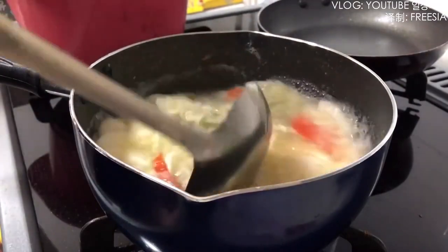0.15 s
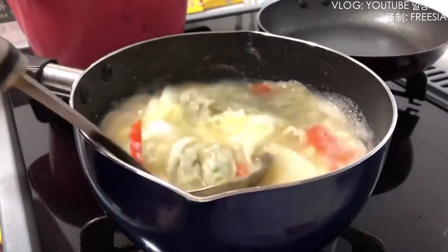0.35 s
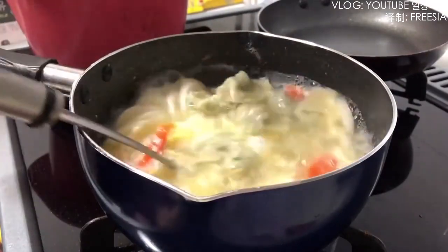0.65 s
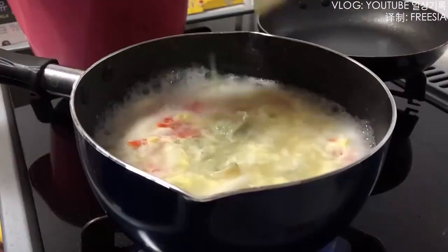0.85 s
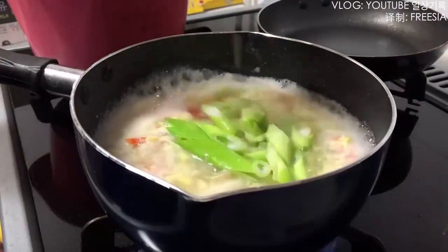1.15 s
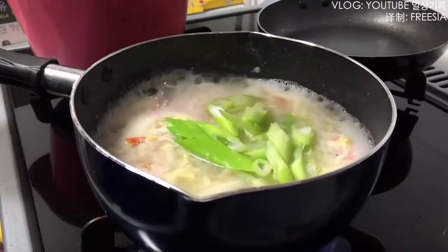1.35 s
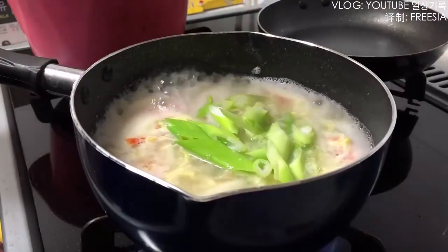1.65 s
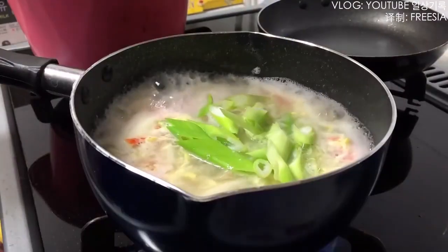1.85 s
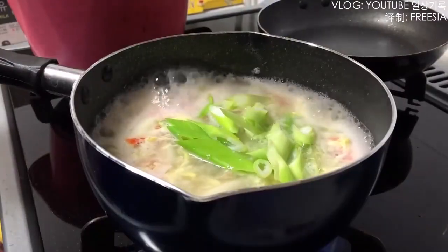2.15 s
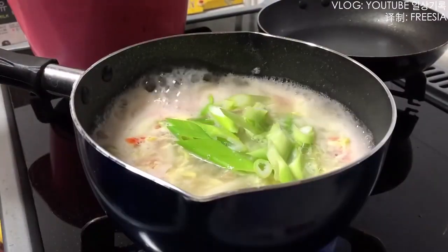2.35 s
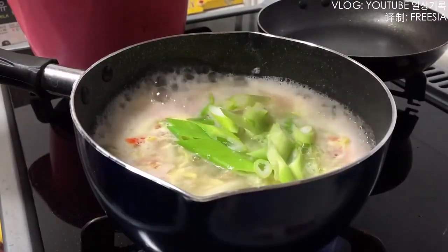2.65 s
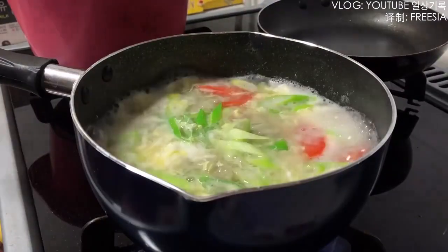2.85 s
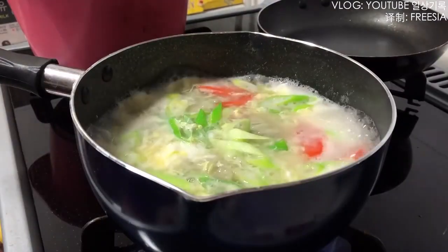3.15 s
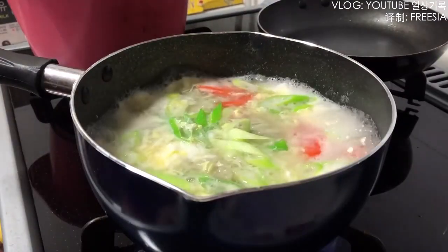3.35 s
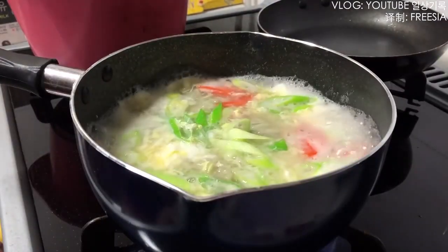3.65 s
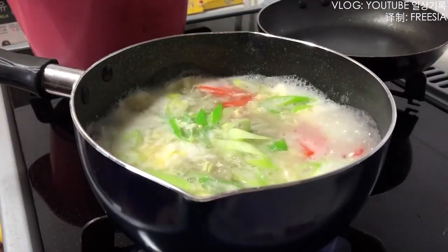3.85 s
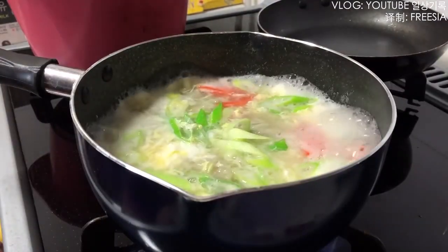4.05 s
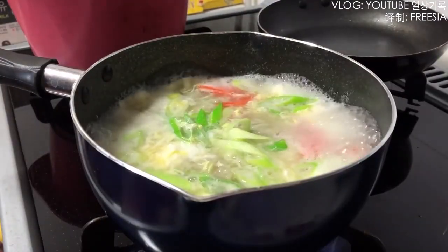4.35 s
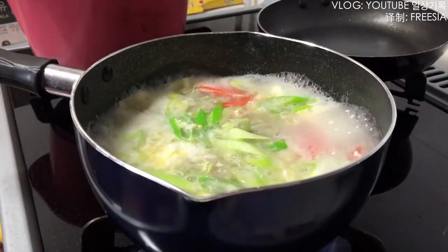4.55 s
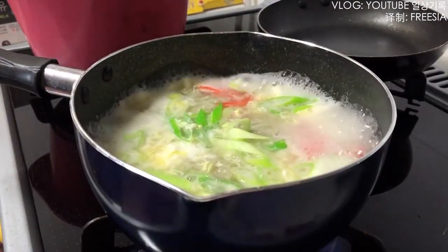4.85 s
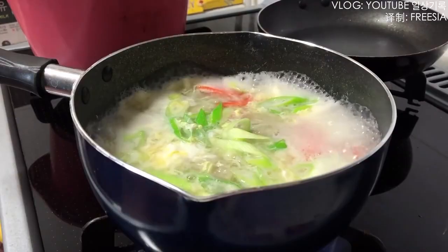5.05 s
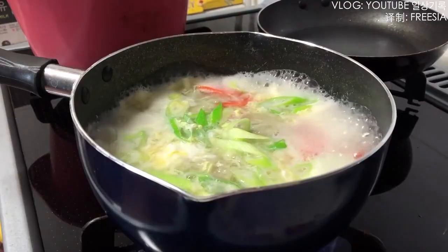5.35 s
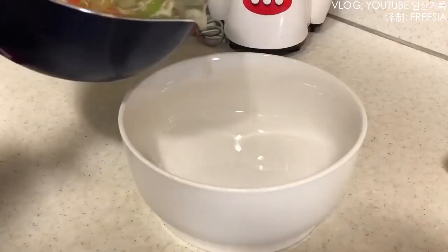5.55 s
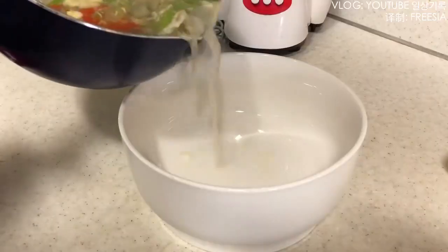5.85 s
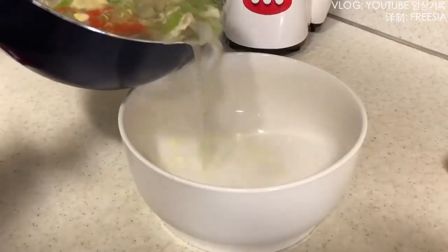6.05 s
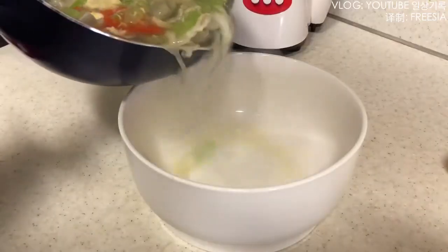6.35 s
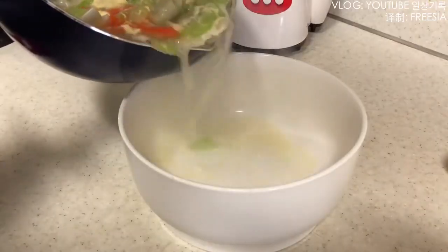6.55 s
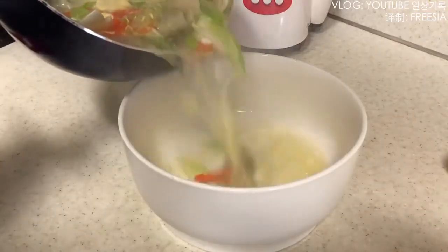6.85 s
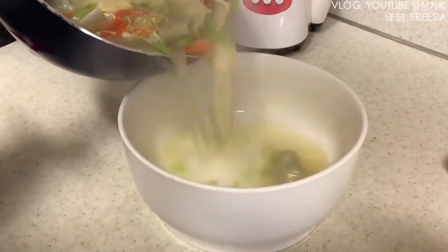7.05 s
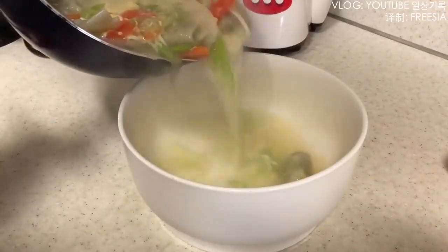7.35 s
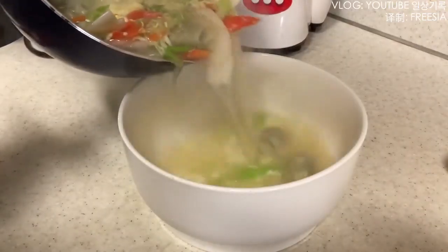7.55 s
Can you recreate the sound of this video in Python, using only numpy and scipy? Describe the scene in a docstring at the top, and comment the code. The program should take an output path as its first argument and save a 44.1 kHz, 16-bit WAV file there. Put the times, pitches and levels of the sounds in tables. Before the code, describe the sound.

Four close-miked kitchen moments joined by abrupt cuts, with only a short dull room reverberation. First a low flame, bubbling and ladle knocks; then a stronger flame hiss with wet leek ticks, a rubbing swish and a clunk, and a long simmer. Next comes loud crackling sizzle with low scraping of the pot. Finally the background nearly vanishes and soup pours unevenly, spattering, gurgling and faintly ringing the bowl.

```python
"""A small kitchen, one close microphone, four moments joined by hard cuts: low flame, high flame, sizzle, counter.
Soup simmers (gliding sine bubbles) over a hissing gas flame (shaped noise) while ladle and pot knock on the hob
(struck modes and short noise) and sliced leek drops in (short noise bursts). The tilted pot sizzles on its hot
wall (surging hiss and crackle); then, at a quiet counter, soup splashes (ticks, low plops, spatter, spray,
gurgling bubbles) into a china bowl that rings (decaying modes)."""
import sys
import numpy as np
from scipy import signal
from scipy.fft import rfft, irfft
from scipy.io import wavfile
from scipy.ndimage import uniform_filter1d

SR = 44100
rng = np.random.default_rng(int(sys.argv[2]) if len(sys.argv) > 2 else 0)


def amplitude_ratio(level_db):
    """Convert a level in decibels to the matching linear amplitude (field) ratio."""
    exponent = np.asarray(level_db, float) / 20
    return 10 ** exponent


def wav_record(signal):
    """Record a signal, one row per channel, as 16-bit PCM in the file named by sys.argv[1]."""
    frames = np.transpose(np.atleast_2d(signal))
    bounded = np.clip(frames, -1, 1)
    # unit amplitude maps onto the largest positive 16-bit level
    quanta = np.round(bounded * 32767).astype(np.int16)
    wavfile.write(sys.argv[1], SR, quanta)


N = 340011
T = np.arange(N) / SR
HZ = np.maximum(np.fft.rfftfreq(N, 1 / SR), 1)

# borders of the four moments: (time [s])
CUTS = [0, .862, 4.582, 5.51, 7.72]

# soup slapping into the bowl: (time [s], tick peak [dB], colour [Hz], spatter against the tick [dB])
SLAPS = [(6.0044, -46, 7000, -11), (6.015, -49, 8000, -10), (6.0553, -29.5, 6400, -9),
         (6.072, -25, 4830, -8.5), (6.134, -40, 5300, -6), (6.1619, -50, 10000, -9),
         (6.255, -37, 4200, -14), (6.2619, -31, 3600, -11), (6.2942, -37, 5100, -5),
         (6.3365, -50, 8600, -16), (6.373, -44, 7000, -10), (6.3897, -33.5, 5900, -17),
         (6.398, -48, 11000, -16), (6.413, -43, 7000, -12), (6.424, -41, 7100, -10),
         (6.4356, -36, 7160, -11), (6.446, -41, 4000, -4), (6.484, -38.5, 3650, -3),
         (6.5158, -35.5, 9500, -14), (6.534, -52, 10000, -16), (6.542, -29, 4980, -26),
         (6.569, -40, 4500, -4), (6.5857, -23, 6550, -15), (6.623, -42, 9000, -12),
         (6.627, -34.5, 7550, -7.5), (6.664, -36.5, 3600, -12), (6.672, -36, 5900, -14),
         (6.6797, -37, 7300, -5), (6.734, -43.5, 7510, -11), (6.75, -40, 4060, -4),
         (6.785, -33.5, 7210, -7.5), (6.806, -40, 4480, -4), (6.8132, -35.5, 5030, -4),
         (6.8362, -36, 6830, -2), (6.8569, -18.5, 8300, -5.5), (6.8774, -17.5, 8000, 0),
         (6.953, -35, 9500, -7), (6.9625, -26, 8540, -10), (6.999, -31, 5340, -8), (7.009, -32, 3530, -4),
         (7.0606, -34, 3550, -9), (7.089, -36, 8300, -4), (7.13, -43, 5300, 1), (7.1744, -39, 3760, -6),
         (7.1827, -40, 8000, -6), (7.192, -34.5, 3100, -7.5), (7.2193, -34, 5500, -13),
         (7.2455, -40, 6800, -5), (7.2648, -34, 7820, -9), (7.2874, -27.5, 4930, -6.5),
         (7.298, -41, 5020, -19), (7.3386, -30, 4900, -7.5), (7.3614, -33, 5750, -10),
         (7.376, -34, 8000, -12), (7.385, -31.5, 7200, -7), (7.4226, -41, 5520, -6),
         (7.4415, -36.5, 3330, -7.5), (7.4856, -44, 3780, -8), (7.5114, -39, 8470, -9),
         (7.519, -35, 8000, -13), (7.5246, -31.5, 5500, -7.5), (7.572, -42, 3020, -1),
         (7.6403, -54, 3280, -9), (7.679, -40, 4170, -20)]
# spray of the stream, a reference its layers are trimmed from: (time [s], level [dB])
SPRAY = [(6.03, -81), (6.12, -59.5), (6.2, -73), (6.35, -68), (6.46, -57.5), (6.66, -58.5), (6.73, -73),
         (6.84, -56), (6.9, -56), (7.03, -53), (7.14, -56), (7.16, -57), (7.29, -54.5), (7.42, -55.5),
         (7.5, -65), (7.545, -49.5), (7.71, -57)]
# clear bubbles caught under the stream: (time [s], bubble peak [dB], pitch [Hz], decay [cycles])
PLINKS = [(6.279, -51, 1650, 13), (6.462, -39.5, 2600, 11), (6.513, -40, 2450, 6.4),
          (6.525, -56, 2400, 5.8), (6.568, -44.5, 2540, 14), (6.679, -52, 2500, 11), (6.5, -43, 3500, 9),
          (6.582, -48, 2900, 6), (7.535, -49, 1500, 43), (6.849, -44, 3200, 5.9), (7.64, -55, 3900, 25),
          (7.567, -51, 1800, 6.9)]
# lumps of soup plunging in, a reference for gurgle and tremble: (time [s], hold [s], level [dB])
GLUGS = [(6.02, 0.085, -57), (6.253, 0.02, -49.5), (6.373, 0.0062, -45.5), (6.46, 0.041, -49),
         (6.61, 0.022, -46.5), (6.655, 0.033, -44.5), (6.747, 0.018, -42), (6.83, 0.058, -49.5),
         (6.93, 0.017, -47.5), (7.075, 0.0091, -42.5), (7.18, 0.018, -60), (7.286, 0.033, -62),
         (7.535, 0.03, -61)]
# resonances of bowl and pooled soup: (frequency [Hz], width [Hz], strength [dB])
POOL = [(109, 39, -2), (201, 82, 0), (288, 47, -4.5), (605, 89, -8)]
# blows and heavy splashes that ring the bowl: (time [s], peak [dB], colour [Hz])
BOWL_RINGS = [(5.958, -37, 2350), (5.956, -48, 6300), (6.055, -47, 4220), (6.07, -34.5, 4240),
              (6.136, -64, 3500), (6.216, -46.5, 4200), (6.261, -53, 3300), (6.855, -46, 1620),
              (6.88, -39.5, 1620)]
# modes of the china bowl: (frequency [Hz], strength [dB], t60 [s])
BOWL_MODES = [(1620, -6, .09), (2433, -4, .1), (2470, -19, .06), (2920, -18, .07), (3892, -8, .12),
              (4185, -10, .12), (4230, -2, .13), (5787, -3, .11), (7000, -7, .12), (8005, -8, .12),
              (9995, -5, .1)]
# light ticks on thin metal before the pour: (time [s], level ahead of the ring/noise mix [dB], colour [Hz])
METAL_TICKS = [(5.713, -36.5, 6760), (5.862, -34.5, 6200)]
# modes of the thin metal: (frequency [Hz], strength [dB], t60 [s])
METAL_MODES = [(2410, -4, 0.13), (2850, -6, 0.13), (3900, -4.5, 0.25), (4400, -10, 0.19),
               (4700, -20, 0.093), (4980, 1, 0.11), (5500, -6, 0.12), (5900, -21, .09), (6430, -24, .09),
               (6900, 6, 0.057), (6980, 8, 0.076), (7110, -17, .09), (7795, -19, .06), (8200, -19, 0.084),
               (9500, -15, .06), (10600, 1, 0.064), (11100, -4, 0.088), (11500, -12, .08), (12440, -8, .06)]

# dull knocks, and from 6.75 s the low plops of heavy soup slaps:
# (time [s], peak [dB], colour [Hz], length of the noise [s], crack in the blend [dB])
KNOCKS_AND_PLOPS = [(.337, -28, 2030, 0.005, 0), (0.409, -33.5, 1000, 0.0059, -6),
                    (0.821, -26.5, 590, 0.012, 0.5), (0.846, -35, 607, 0.014, -5),
                    (2.843, -32.5, 690, 0.0084, -2), (3.096, -26.5, 900, 0.016, -2),
                    (3.099, -29, 560, 0.015, -25), (3.111, -31.5, 1900, 0.022, -20),
                    (3.105, -28.5, 1490, 0.011, -20), (3.127, -30, 1770, .006, -25),
                    (3.142, -36.5, 1380, 0.045, -25), (4.647, -27.5, 665, 0.047, -25),
                    (5.302, -27, 258, 0.016, -30), (5.326, -24.5, 331, 0.03, -30),
                    (5.74, -54.5, 700, .008, -15), (5.761, -55, 600, .008, -13),
                    (5.956, -18, 583, 0.0078, -36), (6.754, -47, 536, 0.0059, -15),
                    (6.859, -27.5, 1000, 0.0068, 0), (6.874, -26.5, 754, 0.022, 17),
                    (6.947, -39, 566, 0.01, -15), (7.061, -31.5, 1150, 0.0087, 3),
                    (7.087, -31.5, 600, 0.006, -24), (7.186, -45, 650, 0.009, -12),
                    (7.287, -38.5, 1030, 0.0072, -7), (7.361, -46.5, 1400, 0.0042, -10),
                    (7.526, -41, 1000, .012, -6), (7.538, -36, 820, 0.022, -18),
                    (7.571, -42, 1500, 0.01, -12), (7.59, -45.5, 1000, 0.016, -15),
                    (7.683, -47, 700, 0.011, -10)]
# low modes of pot, hob and counter, lent to the plops too: (frequency [Hz], strength [dB], t60 [s], held to .4 s)
BODY_MODES = [(119, 7, 0.46), (219, -5, .2), (238, 11.5, 0.22), (302, 7.5, 0.16), (366, 9.5, 0.12),
              (433, -9, 0.053), (560, 1, 0.034), (643, -2.5, 0.098), (690, -10, 0.064), (840, -8, 0.064),
              (937, -1.5, 0.055), (1270, -6, .04), (1530, 8.5, 0.023), (1745, 5.5, 0.1), (2025, 8.5, 0.076),
              (2060, -16, 0.054), (2380, 3, 0.033)]

# ladle scraping round the pot: (time [s], low metal [dB], high metal [dB], pot body [dB])
STIR = [(.342, -42.5, -56, -45), (.39, -48.5, -56, -54), (.412, -46.5, -49, -55), (.44, -51, -56, -57),
        (.455, -53.5, -49, -49), (.51, -66, -62, -58), (.57, -67, -65, -69), (.65, -63, -57, -56.5),
        (.74, -57, -60, -56), (.77, -57, -59, -58), (.81, -65, -55, -54)]
# ladle striking the pot wall: (time [s], peak [dB], colour [Hz])
CLANKS = [(.338, -28, 1000), (.413, -40, 950), (.453, -42, 3000), (.828, -42, 5500)]
# resonances of the ladle: (frequency [Hz], width [Hz], strength [dB])
LADLE = [(984, 180, 2.5), (1940, 65, 4.5), (2280, 55, -0.5), (2720, 54, 2.5), (3410, 46, 5),
         (4000, 87, 0.5), (4880, 200, -1), (5500, 62, 5.5), (6100, 120, -14), (3600, 4800, -21)]
# lifted pot dragging on the trivet in jerks: (time [s], hold [s], lowest mode [dB], upper modes [dB])
DRAG = [(4.755, 0.087, -41.5, -40.5), (4.95, 0.028, -50, -48.5), (5.01, 0.035, -59, -48),
        (5.07, 0.047, -52, -46), (5.175, 0.037, -48, -48.5), (5.298, 0.024, -46, -42.5),
        (5.4, 0.063, -52, -59)]
# resonances of the trivet: (frequency [Hz], width [Hz], strength [dB])
TRIVET = [(120.5, 3.94, 2), (199, 15, -1.5), (269, 35, -14.5), (398, 18, -8), (536, 19, -10.5),
          (1020, 120, -18.5)]
# something brushing past the pot: (time [s], swish [dB], rub [dB])
BRUSH = [(2.86, -54, -46.5), (2.884, -59, -55), (2.934, -54, -52), (2.964, -39.5, -46),
         (2.998, -39.5, -44.5), (3.03, -48.5, -53), (3.08, -59, -54)]
# resonances of the swish: (frequency [Hz], width [Hz], strength [dB])
SWISH = [(2350, 230, 2), (3100, 200, 1), (4340, 210, -4), (4000, 3400, -1)]
# leek slices landing: (time [s], peak [dB], colour [Hz], t60 [s])
LEEK = [(.732, -41, 4000, 0.022), (0.749, -38, 2200, 0.014), (1.046, -35, 6900, .02),
        (1.066, -29, 5940, 0.033), (1.081, -32, 7500, 0.02), (1.123, -33.5, 2500, 0.04),
        (1.142, -32.5, 4970, 0.046), (1.164, -38, 5100, .025), (1.18, -52, 2000, .025)]

# spurts of steam as soup meets the hot wall: (time [s], hold [s], hiss [dB], whistle [dB])
SPURTS = [(4.582, 0.0032, -64, -34.5), (4.615, 0.0054, -54, -34), (4.655, 0.047, -36.5, -42),
          (4.738, 0.052, -36.5, -44.5), (4.82, 0.026, -54, -45)]
# clearest bubbles of the simmer: (time [s], peak [dB], pitch [Hz])
POPS = [(.653, -44, 900), (1.068, -38, 790), (1.164, -40.5, 850), (1.48, -45, 784), (1.633, -41, 1080),
        (1.632, -49, 330), (1.708, -40.5, 356), (1.71, -40, 750), (1.752, -43, 322), (1.84, -48, 500),
        (1.9, -38, 1690), (2.007, -46, 750), (2.083, -53, 600), (2.117, -44, 1150), (2.447, -40, 1900),
        (2.698, -37.5, 1520), (3.219, -40.5, 1200), (3.258, -48, 1080), (3.606, -44, 786),
        (3.778, -43, 800), (3.875, -44, 1900), (4.348, -46, 650), (4.492, -43.5, 473), (4.556, -44, 416)]

# corner points of the air spectra: (frequency [Hz])
AIR_HZ = [30, 50, 85, 140, 240, 370, 600, 1000, 1500, 2200, 3500, 6000, 9000, 12000, 15000]
# steady air, a row per moment, a column per corner point: (relative spectrum level [dB])
AIR_COLOUR = [
    [-9, -4, 5, -4.5, 1, -8, -14.5, -8.5, -4.5, -6, -7.5, -8.5, -7.5, -14, -20],
    [5, -7.5, 6, -6, 0, -5.5, -10.5, -3.5, -7.5, -6, -8, -9, -10, -12.5, -20.5],
    [-19, -7, -4, -6, -4, -10, -11.5, -14.5, -10.5, -14, -14.5, -13, -12, -15.5, -21],
    [-11, -6, -5.5, -10.5, -9, -16.5, -18, -23, -28.5, -32, -33.5, -33, -31.5, -34, -39],
]
# narrow burner and pot resonances added to each air, a list per moment: (frequency [Hz], width [Hz], added gain [dB])
AIR_RESONANCES = [
    [(1102, 48, 10), (2500, 85, -17)],
    [(1118, 53, 7), (1946, 330, -3), (4060, 24, 5.5), (5100, 150, -8), (6830, 46, 3), (8340, 146, 1.5),
     (8600, 108, 12), (8900, 99, 8)],
    [(1583, 27, 4.5), (2370, 35, 9), (3520, 90, 0), (4080, 62, 6), (5600, 53, 0), (6800, 160, -3),
     (8700, 100, 2), (11000, 60, 2)],
    [(272, 27, 3)],
]
# level of the 2.5-12 kHz air before flutter, a list per moment: (time [s], level [dB])
AIR_LEVEL = [
    [(0, -56), (.7, -56.5), (.86, -56.5)],
    [(.86, -51), (1.6, -52), (2.8, -50.5), (3.4, -51), (4.58, -50)],
    [(4.58, -45), (4.645, -47.5), (4.665, -44), (4.87, -43.5), (4.91, -46), (4.95, -43.5), (5.17, -44),
     (5.21, -43.5), (5.51, -43)],
    [(5.51, -75.5), (7.71, -72)],
]


def unit(x):
    """Scale to rms 1."""
    return x / np.sqrt(np.mean(x ** 2))


def peak_one(x):
    """Scale to peak 1."""
    return x / np.abs(x).max()


def add(out, s, sound):
    """Mix a sound in at s seconds."""
    i = int(s * SR)
    out[i:i + len(sound)] += sound[:N - i]


def curve(rows, col, edge_s=0.0065):
    """Gain drawn through a dB column, with short fades and silence outside the rows."""
    r = np.array(rows, float)
    gate = np.clip(np.minimum(T - r[0, 0], r[-1, 0] - T) / edge_s + 1, 0, 1)
    return gate * amplitude_ratio(np.interp(T, r[:, 0], r[:, col]))


def swells(rows, col, rise_s, fall_s):
    """Gain of events that rise in a line, hold and die away exponentially."""
    s, hold, db = np.array(rows, float)[:, [0, 1, col], None].transpose(1, 0, 2)
    late = np.clip(T - s - rise_s - hold, 0, None) / fall_s
    return np.max(amplitude_ratio(db) * np.clip((T - s) / rise_s, 0, 1) * np.exp(-late), axis=0)


def walk(rate):
    """Slow random drift with rms 1: smoothed steps, rate of them a second."""
    k = int(SR / rate)
    steps = np.repeat(rng.standard_normal(N // k + 1), k)
    return unit(uniform_filter1d(uniform_filter1d(steps, k), k)[:N])


def band(x, lo_hz, hi_hz):
    """Band-pass."""
    sos = signal.butter(2, [lo_hz, min(hi_hz, .45 * SR)], "band", fs=SR, output="sos")
    return signal.sosfilt(sos, x)


def hiss(lo_hz, hi_hz, rough_db, rate):
    """Band noise of rms 1, then roughened by a drifting gain."""
    return amplitude_ratio(rough_db * walk(rate)) * unit(band(rng.standard_normal(N), lo_hz, hi_hz))


def burst(colour_hz, octaves, t60, rise_s, size=SR // 3):
    """Noise around a colour that rises and dies away, peak 1."""
    t = T[:size]
    x = rng.standard_normal(len(t)) * (1 - np.exp(-t / rise_s)) * 1000. ** (-t / max(t60, .002))
    return peak_one(band(x, colour_hz / 2 ** octaves, colour_hz * 2 ** octaves))


def bells(peaks):
    """Summed gain of resonance peaks over frequency."""
    return sum(amplitude_ratio(db) / (1 + (2 * (HZ - hz) / width) ** 2) for hz, width, db in peaks)


def resonant(peaks):
    """Noise through resonances, rms 1."""
    return unit(irfft(rfft(rng.standard_normal(N)) * bells(peaks), N))


def patchy(peaks, patchy_db, rate):
    """Noise-driven resonances that each come and go on their own, rms 1."""
    out = np.zeros(N)
    for hz, width, db in peaks:
        gain = amplitude_ratio(db + patchy_db * walk(rate)) * np.sqrt(width)
        b, a = signal.iirpeak(hz, hz / width, SR)
        out += gain * unit(signal.lfilter(b, a, rng.standard_normal(N)))
    return unit(out)


def judder(peaks, waver_db, rate):
    """Resonances kept ringing by a rubbing contact: pitch and level waver; rms 1."""
    out = np.zeros(N)
    for hz, width, db in peaks:
        gain = amplitude_ratio(db + waver_db * walk(rate)) * np.sqrt(width)
        turns = np.cumsum(hz + width * walk(rate)) / SR
        out += gain * np.sin(2 * np.pi * turns)
    return unit(out)


def ring(modes, colour_hz, span, scatter_db, detune=0.01):
    """Struck modes dying away, peak 1; those far from the colour (span in octaves) are weaker."""
    hz, db, t60 = np.transpose(modes)[:, :, None]
    luck = rng.standard_normal((2, len(modes), 1))
    gain = amplitude_ratio(db + scatter_db * luck[0]) / (1 + (np.log2(hz / colour_hz) / span) ** 2)
    t = T[:SR // 3]
    decay = 1000. ** (-t / np.clip(t60, .01, .4))
    return peak_one(np.sum(gain * np.sin(2 * np.pi * hz * (1 + detune * luck[1]) * t) * decay, axis=0))


def drop(db, hz, cycles, glide):
    """One bubble: a dying sine that glides up, peak at db."""
    turns = hz * T[:SR // 10]
    fade = np.exp(-turns / cycles) * (1 - np.exp(-4 * turns / cycles))
    return amplitude_ratio(db) * peak_one(np.sin(2 * np.pi * turns * (1 + glide * turns)) * fade)


def bubbles(gain, rate, lo_hz, hi_hz, cycles, glide, spread_db):
    """Random dying sines that glide up, rate a second from first to last gain; rms 1 there, times the gain."""
    start, end = T[np.flatnonzero(gain)[[0, -1]]]
    out = np.zeros(N)
    for when, pitch, size in rng.random((int(rate * (end - start)), 3)):
        hz = lo_hz * (hi_hz / lo_hz) ** pitch
        turns = hz * T[:int(4 * cycles * SR / hz)]
        level = amplitude_ratio(-spread_db * np.log(max(size, .015)))  # a few are much louder
        tone = np.sin(2 * np.pi * turns * (1 + glide * turns / cycles)) * np.exp(-turns / cycles)
        add(out, start + when * (end - start), level * tone)
    return gain * unit(out) * np.sqrt((end - start) / T[-1])


def slap(db, hz, spatter_db):
    """A sharp tick, then the film of liquid spatters in droplets."""
    tick = band(burst(hz, .8, .003, .0001, size=SR // 8), 800, 13200)
    film = burst(1.07 * hz, 0.53, 0.073, 0.00017, size=SR // 8)
    k = int(.0015 * SR)  # length of one droplet
    droplets = np.repeat(amplitude_ratio(2.5 * rng.standard_normal(len(film) // k + 1)), k)
    grain = uniform_filter1d(droplets, k // 2)[:len(film)]
    return amplitude_ratio(db) * (peak_one(tick) + amplitude_ratio(spatter_db) * band(grain * film, 1500, 10600))


def soup_slaps():
    """The clearest slaps of soup, each a tick with its spatter."""
    out = np.zeros(N)
    for s, db, hz, spatter_db in SLAPS:
        add(out, s, slap(db, hz, spatter_db))
    return out


def spray(gain):
    """The stream breaks up: many small slaps, rough hiss and fine bubbles follow one gain."""
    out, start, end = np.zeros(N), SPRAY[0][0], T[-1]
    slaps_per_s, top_slap_db = 34, 13  # loudest tick peak above the spray gain
    for when, pitch, size in rng.random((int(slaps_per_s * (end - start)), 3)):
        s = start + when * (end - start)
        add(out, s, gain[int(s * SR)] * slap(top_slap_db - 8 * size, 3000 * 2.8 ** pitch, -9))
    out += gain * amplitude_ratio(-9.5) * hiss(1200, 13500, 6.6, 75)
    out += bubbles(gain * amplitude_ratio(-6.5), 500, 3200, 11000, 1.5, 0.048, 5.2)
    return out + bubbles(gain * amplitude_ratio(-6.5), 300, 2200, 5500, 6, .03, 4.1)


def plinks():
    """Trapped bubbles ring as dying sines, each with a wet burst of noise."""
    out = np.zeros(N)
    for s, db, hz, cycles in PLINKS:
        wet = amplitude_ratio(db - 2) * burst(1.17 * hz, 0.33, 0.074, 0.00092, size=SR // 10)
        add(out, s, drop(db, hz, cycles, .0008) + wet)
    return out


def gurgle():
    """Plunging lumps trap low bubbles and stir the resonances of bowl and pool."""
    gain = swells(GLUGS, 2, rise_s=0.0017, fall_s=0.031)
    low = bubbles(gain * amplitude_ratio(-6), 400, 129, 317, 2.4, 0.038, 1.5)
    middle = bubbles(gain * amplitude_ratio(-13), 400, 405, 760, 3.6, 0.055, 2.8)
    return low + middle + gain * amplitude_ratio(-6) * band(patchy(POOL, 1.1, 40), 67, 820)


def counter_tremble():
    """The counter trembles under each plunge: slow-fading low noise."""
    return swells(GLUGS, 2, rise_s=0.0017, fall_s=0.087) * amplitude_ratio(-10) * hiss(38, 121, 3.2, 5.1)


def bowl_rings():
    """Blows and heavy splashes ring the modes of the china."""
    out = np.zeros(N)
    for s, db, hz in BOWL_RINGS:
        add(out, s, amplitude_ratio(db) * ring(BOWL_MODES, hz, 0.39, 1.0, detune=0.0033))
    return out


def metal_ticks():
    """Light ticks on thin metal: ringing modes with a little noise."""
    out = np.zeros(N)
    for s, db, hz in METAL_TICKS:
        blend = 0.76 * ring(METAL_MODES, hz, 1.3, 1.5) + 0.23 * burst(hz, 1.0, 0.12, 0.00035)
        add(out, s, amplitude_ratio(db) * blend)
    return out


def bowl():
    """Soup lands in the bowl, and the splashes keep the china singing through its modes."""
    gain = curve(SPRAY, 1, 0.029)
    out = soup_slaps() + spray(gain) + plinks() + bowl_rings() + metal_ticks()
    china = ring(BOWL_MODES, 1500, 0.99, 1.0, detune=0.0028)
    singing = signal.fftconvolve(out * (T > SPRAY[0][0]), china)[:N] / 8
    out += amplitude_ratio(-23.5) * singing
    out += bubbles(gain * amplitude_ratio(-15), 120, 900, 2400, 4, .04, 3.5)  # larger bubbles of the stream
    return out + gurgle() + counter_tremble()


def knocks_and_plops():
    """Knock or wet plop: a patch of noise drives low modes; crack on top, thump below; the next cut ends it."""
    out, t = np.zeros(N), T[:SR // 3]
    for s, db, hz, lasts, crack_db in KNOCKS_AND_PLOPS:
        thump_db = -5 - 6 * np.log2(hz / 500) - 250 * lasts  # bright and long ones thump less
        noise = rng.standard_normal(len(t)) * (1 - np.exp(-t / (0.02 * lasts))) * np.exp(-(t / lasts) ** 2)
        noise[0] = np.linalg.norm(noise) * 0.0084 / lasts  # short ones are mostly one strike
        direct = band(band(noise, hz / 3.1, hz * 1.7), hz / 4, hz * 1.7)
        body = signal.fftconvolve(noise, ring(BODY_MODES, hz, 0.34, 0.52))[:len(t)]
        dull = burst(0.52 * hz, 1.0, 0.11, 0.0023)
        thump = ring(BODY_MODES, 170, 0.5, 0.7) + 1.36 * burst(122, 1.27, 0.23, 0.0039)
        crack = burst(2800, 1.2, 0.027 + 3.1 * lasts, 0.00017)
        blend = peak_one(direct) + 1.05 * peak_one(body) + .5 * dull
        blend += amplitude_ratio(thump_db) * thump + amplitude_ratio(crack_db) * crack
        left_s = min(c for c in CUTS if c > s) - s
        add(out, s, amplitude_ratio(db) * peak_one(blend)[:int(left_s * SR)])
    return out


def ladle():
    """The ladle scrapes, exciting metal and pot resonances in patches, and clanks on the wall."""
    out = curve(STIR, 1) * patchy(LADLE[:4], 2.2, 39.6)
    out += curve(STIR, 2) * patchy(LADLE[4:], 1.7, 44.0)
    out += curve(STIR, 3) * patchy([(235, 100, -1), (500, 79, -6)], 0.96, 29)
    modes = [(hz, db, .035) for hz, _, db in LADLE[:-1]]  # all with a t60 of .035 s
    for s, db, hz in CLANKS:
        add(out, s, amplitude_ratio(db) * ring(modes, hz, 0.86, 1.0))
    return out


def pot_drag():
    """The lifted pot jerks over the trivet: its lowest mode judders, the upper ones ring in patches."""
    rise_s, fall_s = 0.0095, 0.063
    low = swells(DRAG, 2, rise_s, fall_s) * judder(TRIVET[:1], 2.4, 25)
    high = swells(DRAG, 3, rise_s, fall_s) * patchy(TRIVET[1:], 2.5, 30)
    return (T < CUTS[3]) * amplitude_ratio(1.3 * walk(40)) * (low + high)


def brush():
    """Something brushes past the pot: a resonant swish over a low rub of noise."""
    return curve(BRUSH, 1) * patchy(SWISH, 0.73, 60) + curve(BRUSH, 2) * hiss(140, 1100, .6, 59.6)


def leek():
    """Slices land and tick: sudden noise bursts, each with its own colour and decay."""
    out = np.zeros(N)
    for s, db, hz, t60 in LEEK:
        add(out, s, amplitude_ratio(db) * burst(hz, 0.97, t60, 0.00035))
    return out


def steam_spurts():
    """Soup flashes to steam: broad hiss with a whistle of resonant noise that fades sooner."""
    rise_s, fall_s = 0.0027, 0.04
    whistle = resonant([(8050, 580, 3.5), (1900, 320, -1.5), (9900, 2000, -4.0)])
    steam = swells(SPURTS, 2, rise_s, fall_s) * hiss(3000, 14800, 1.5, 60)
    return steam + swells(SPURTS, 3, rise_s, fall_s / 2) * whistle


def sizzle():
    """Droplets burst on the hot wall: crackle, and hiss that surges band by band."""
    on = (T >= CUTS[2]) * (T < CUTS[3])
    surge = sum(hiss(hz / 2.6, hz * 1.14, 2, 14) for hz in (2600, 4440, 7400, 11400))
    crackle = bubbles(on * amplitude_ratio(-59), 900, 2100, 13000, 1.5, .05, 4.4)
    return on * amplitude_ratio(-60.5) * surge + crackle


def simmer():
    """Soft bubbles break at the surface while the pot is on the flame: gliding sines, low and high."""
    on = T < CUTS[2]
    out = bubbles(on * amplitude_ratio(-62), 160, 250, 1800, 1.2, 0.078, 3.0)
    out += bubbles(on * amplitude_ratio(-65.5), 150, 1490, 7300, 2.5, .05, 3.2)
    for s, db, hz in POPS:
        add(out, s, drop(db, hz, 1.55, 0.011))
    return out


def air():
    """Flame, steam and room hush as shaped noise; below and above 800 Hz it flutters separately."""
    out = np.zeros(N)
    for k, (colour_db, peaks, level) in enumerate(zip(AIR_COLOUR, AIR_RESONANCES, AIR_LEVEL)):
        colour = amplitude_ratio(np.interp(np.log(HZ), np.log(AIR_HZ), colour_db)) * (1 + bells(peaks))
        spectrum = rfft(rng.standard_normal(N)) * colour
        spectrum = spectrum / np.std(irfft(spectrum * (HZ > 2500) * (HZ < 12000), N))
        s, level_db = np.transpose(level)
        gain = amplitude_ratio(np.interp(T, s, level_db)) * (T >= CUTS[k]) * (T < CUTS[k + 1])
        low, high = irfft(spectrum * (HZ < 800), N), irfft(spectrum * (HZ >= 800), N)
        out += gain * (low * amplitude_ratio(0.099 * walk(26)) + high * amplitude_ratio(0.84 * walk(24.6)))
    return out


def kitchen_tail(sharp):
    """Short dull reverberation: the sound smeared by decaying noise of unit energy."""
    t = T[:SR // 3]
    tail = band(rng.standard_normal(len(t)), 130, 4600) * 1000. ** (-t / 0.37) * (t > .003)
    return amplitude_ratio(-18.0) * signal.fftconvolve(sharp, tail / np.linalg.norm(tail))[:N]


def scene():
    """All sources, the same in both channels; bowl, knocks and plops carry the kitchen tail."""
    sharp = bowl() + knocks_and_plops()
    handling = ladle() + pot_drag() + brush() + leek() + steam_spurts()
    mono = sharp + handling + sizzle() + simmer() + air() + kitchen_tail(sharp)
    return np.array([mono, mono])


def low_pass(x):
    """Removes everything above the highest recorded frequency."""
    return signal.sosfilt(signal.butter(12, 16360, fs=SR, output="sos"), x)


def record(dry):
    """The microphone drops the deepest bass (below 42 Hz) and the very top (above 15 kHz)."""
    no_rumble = signal.sosfilt(signal.butter(4, 42, "high", fs=SR, output="sos"), dry)
    mix = signal.sosfilt(signal.ellip(10, .2, 38, 15000, fs=SR, output="sos"), no_rumble)
    return low_pass(mix)


dry = scene()
out = record(dry)
wav_record(out)
```